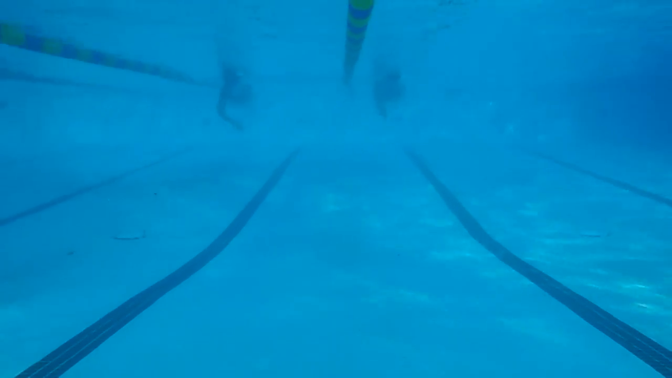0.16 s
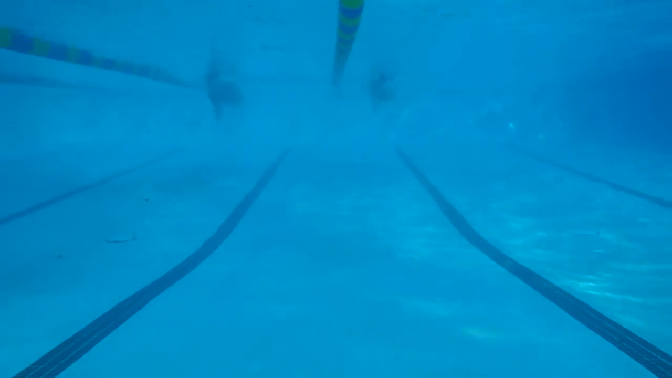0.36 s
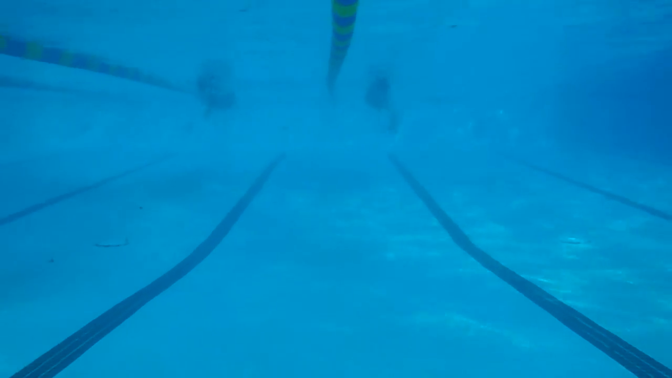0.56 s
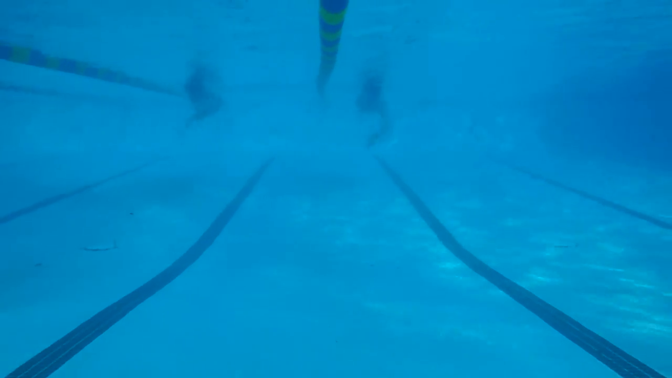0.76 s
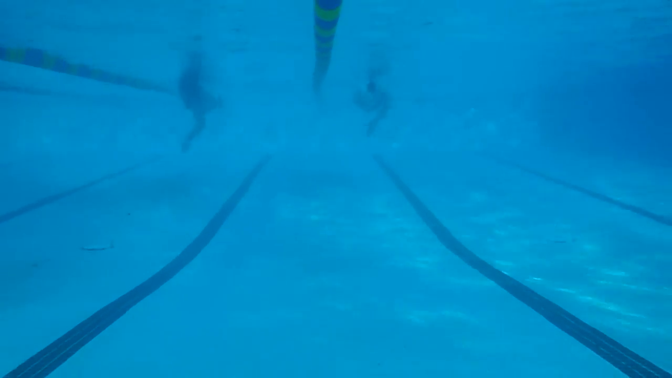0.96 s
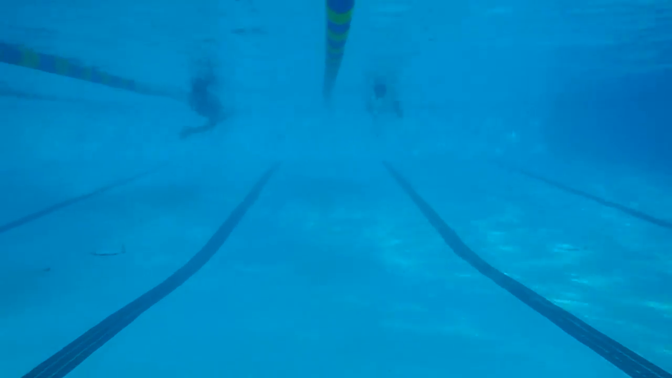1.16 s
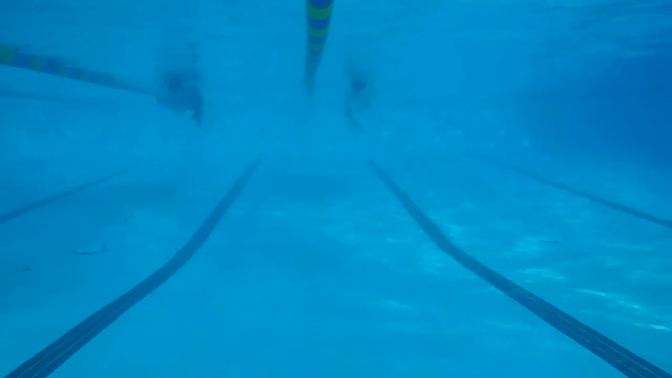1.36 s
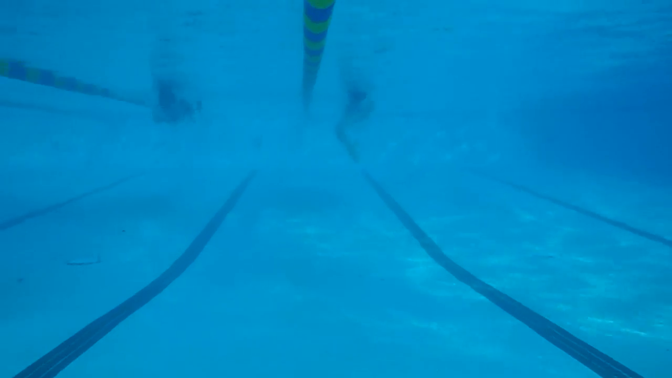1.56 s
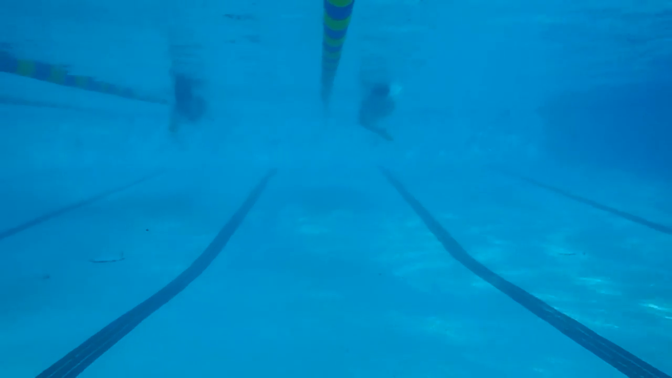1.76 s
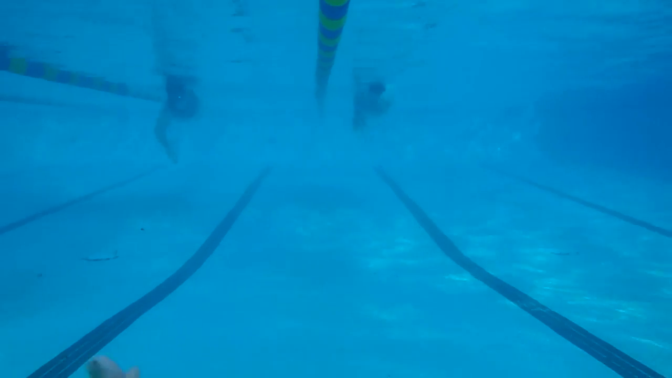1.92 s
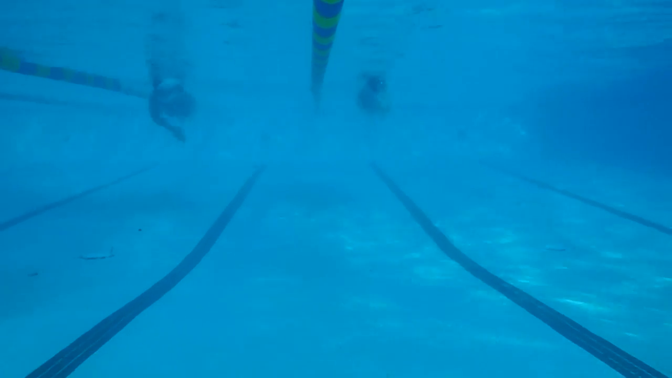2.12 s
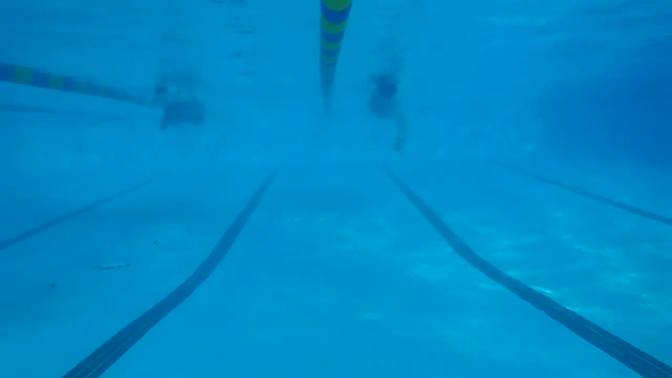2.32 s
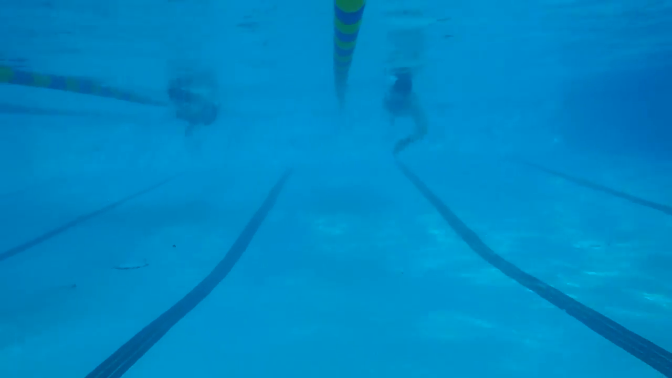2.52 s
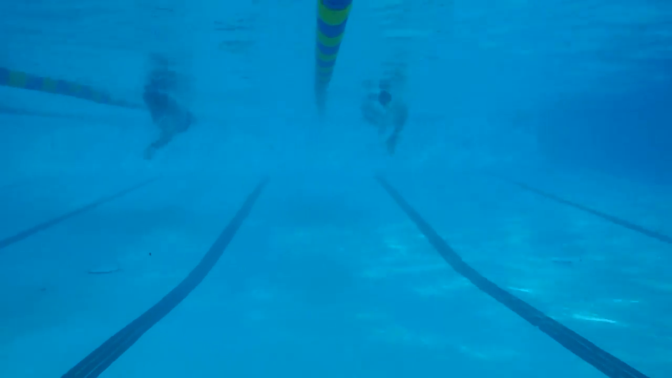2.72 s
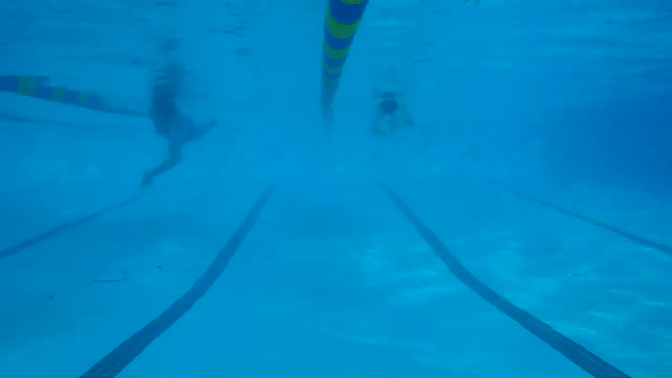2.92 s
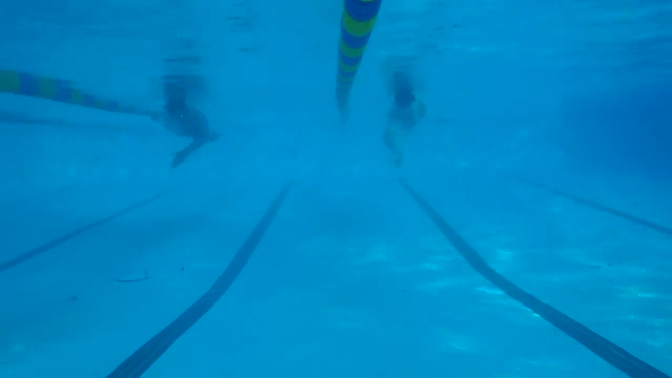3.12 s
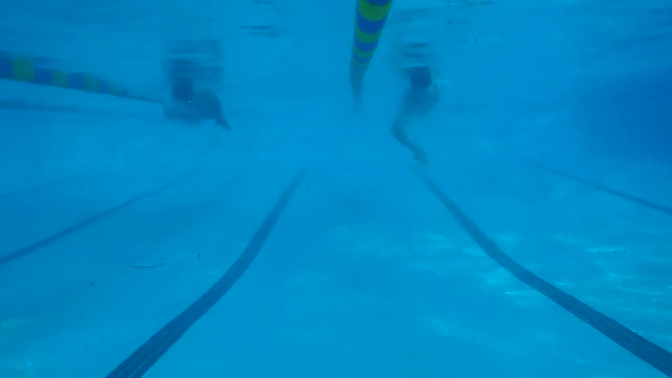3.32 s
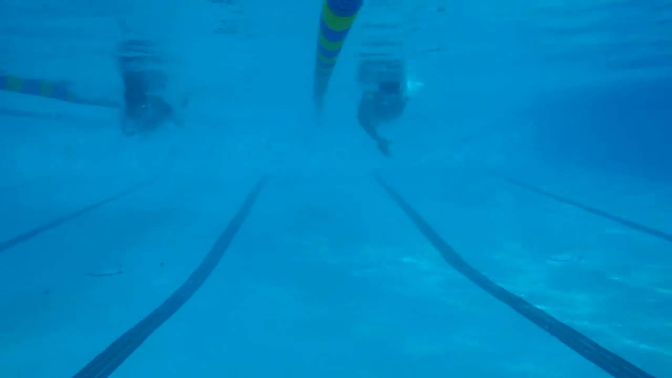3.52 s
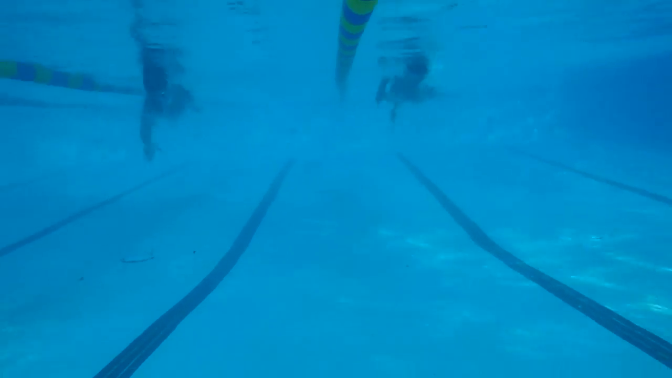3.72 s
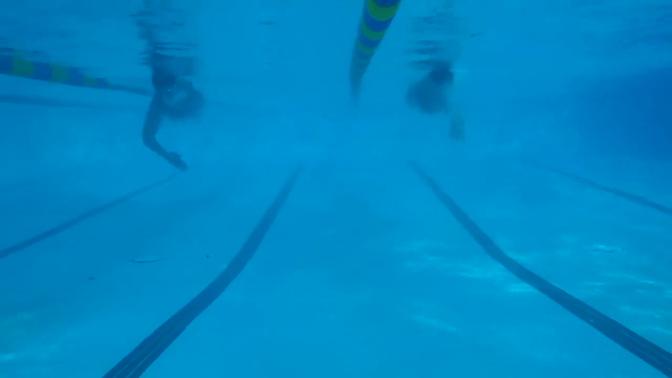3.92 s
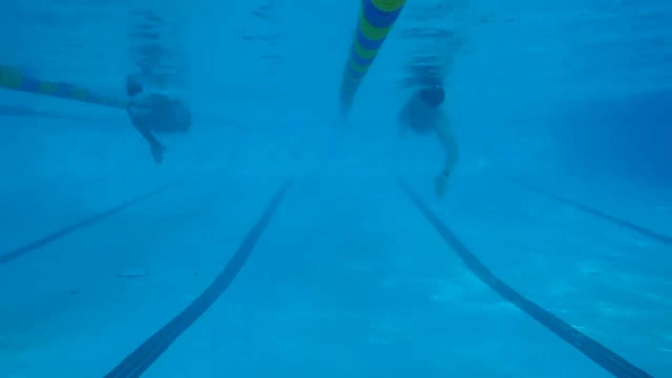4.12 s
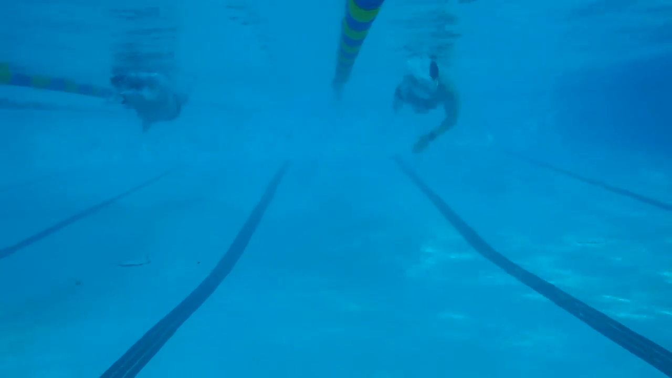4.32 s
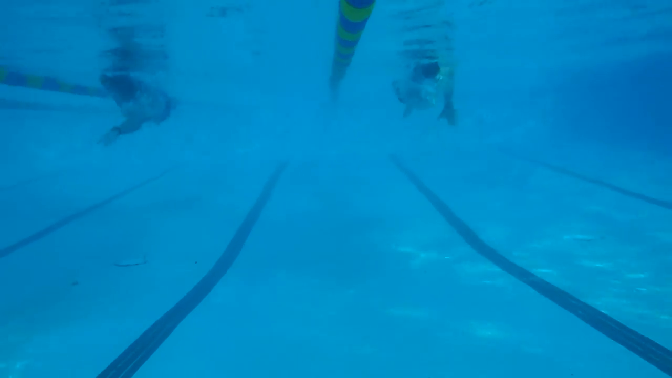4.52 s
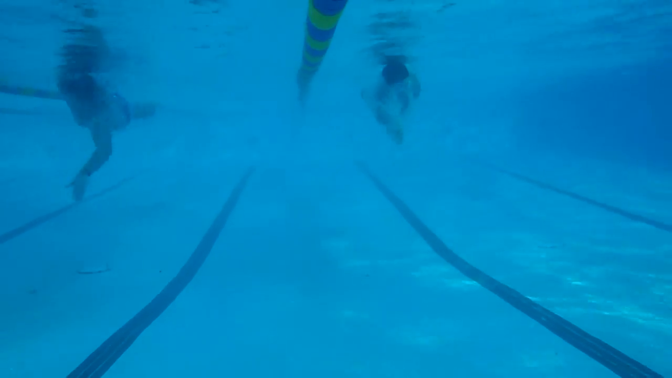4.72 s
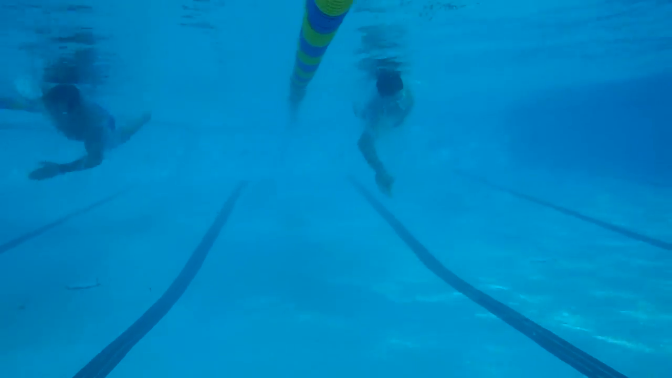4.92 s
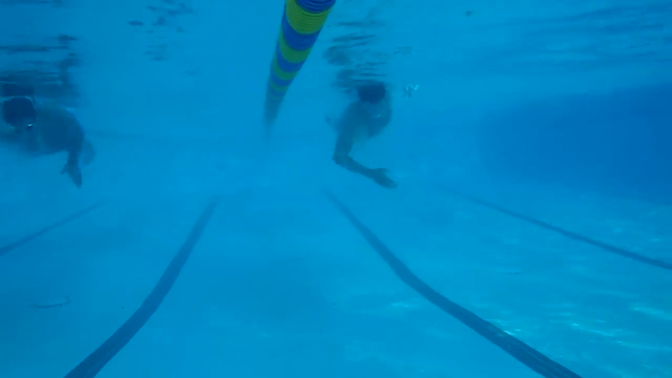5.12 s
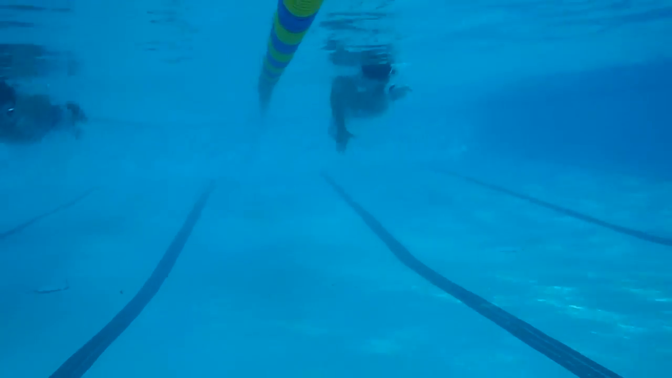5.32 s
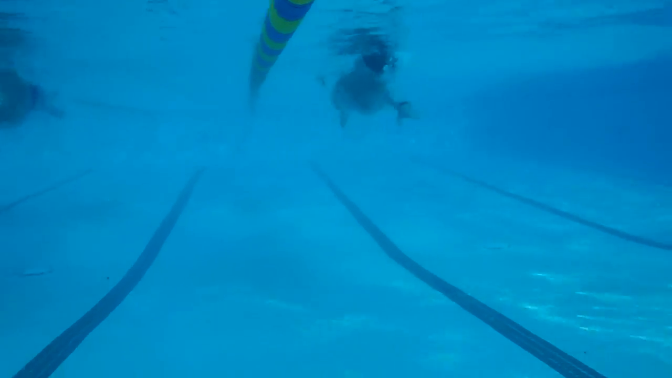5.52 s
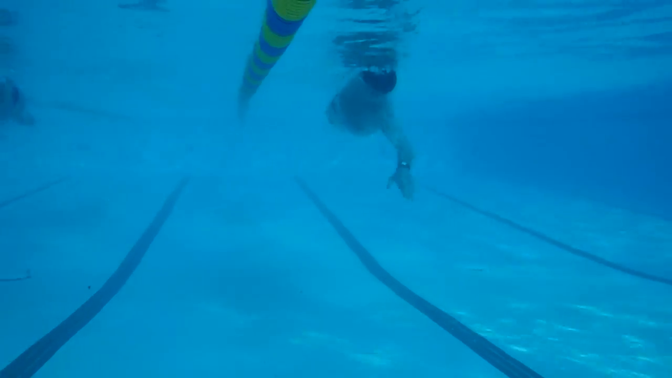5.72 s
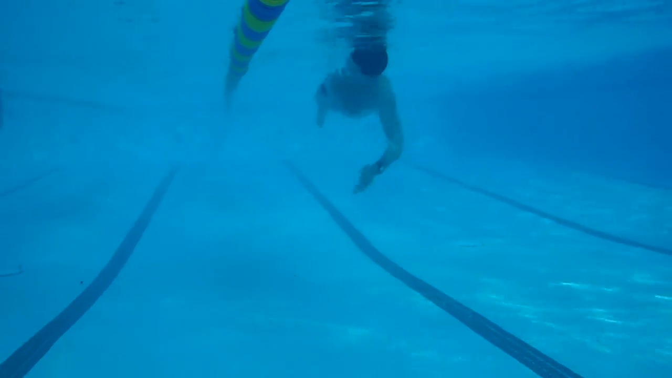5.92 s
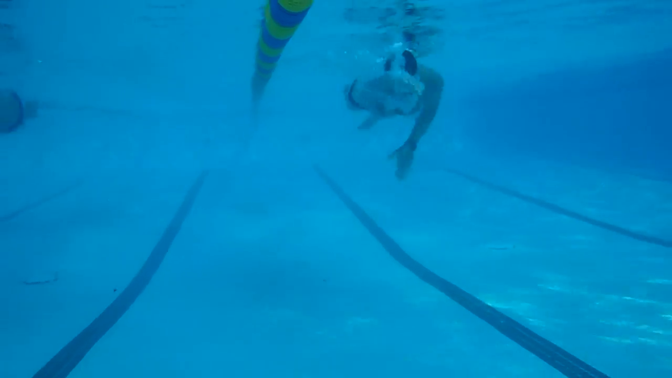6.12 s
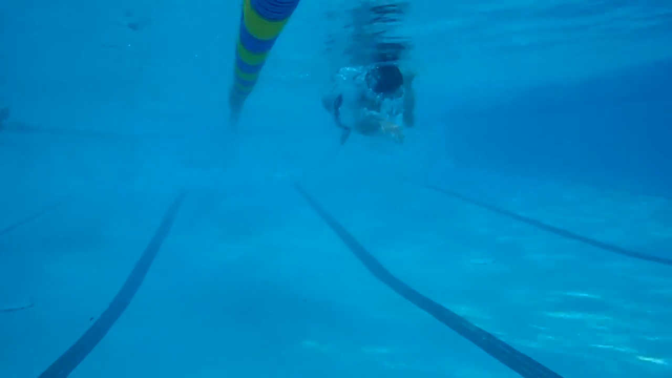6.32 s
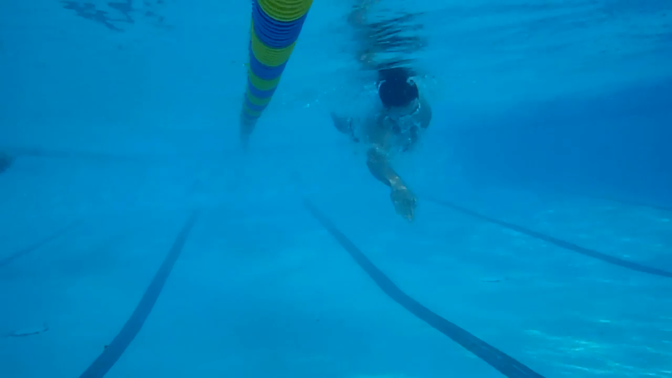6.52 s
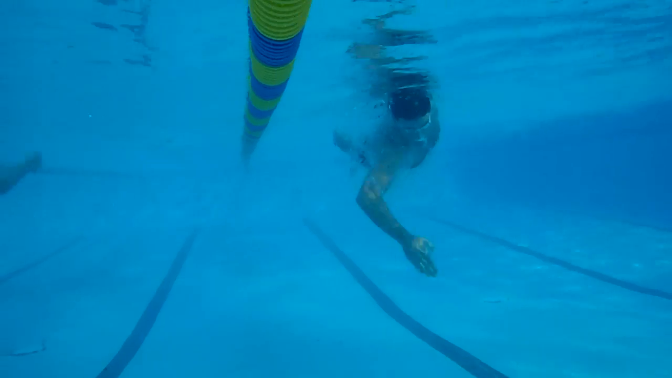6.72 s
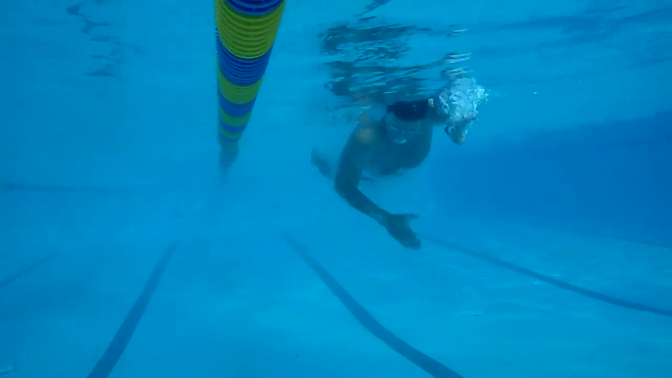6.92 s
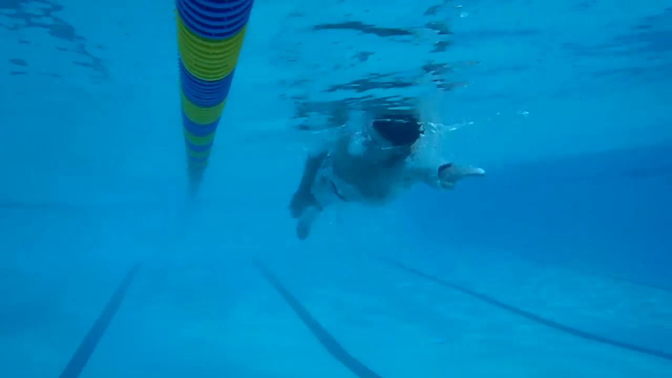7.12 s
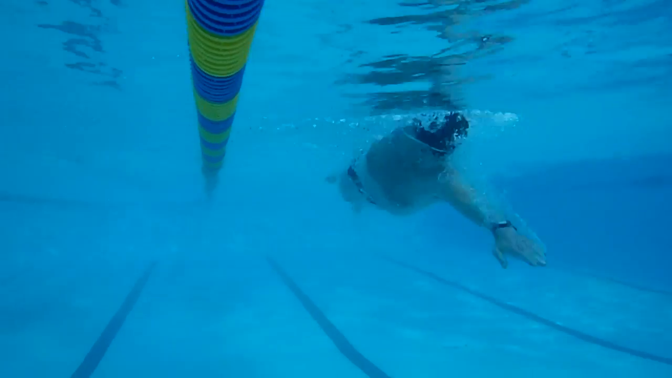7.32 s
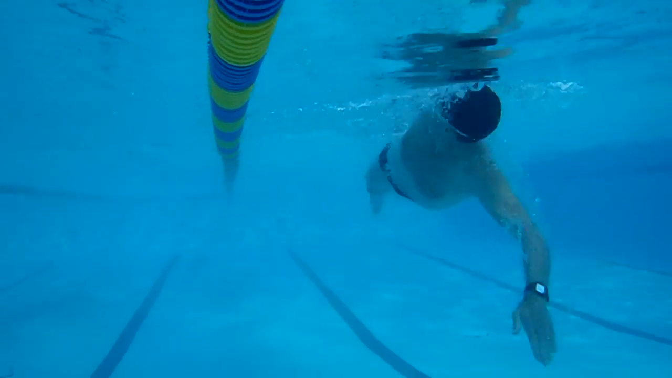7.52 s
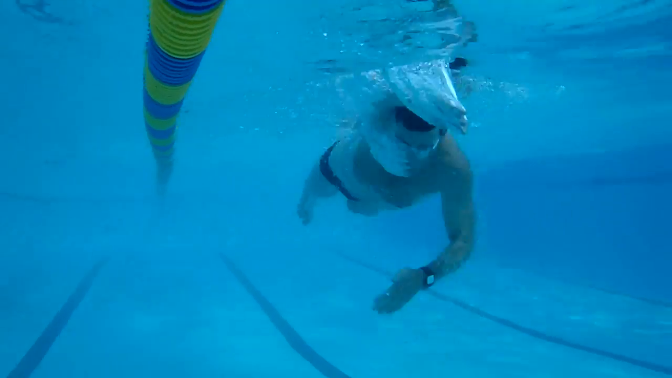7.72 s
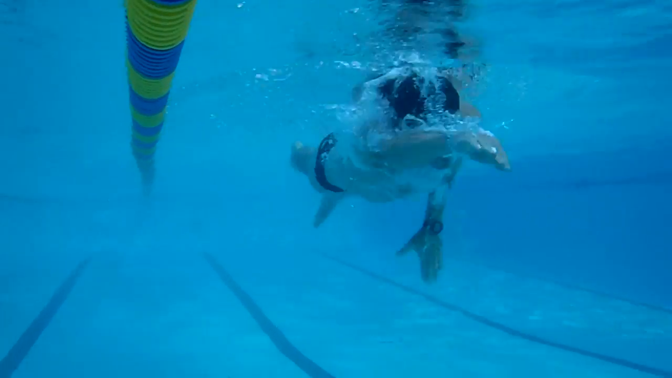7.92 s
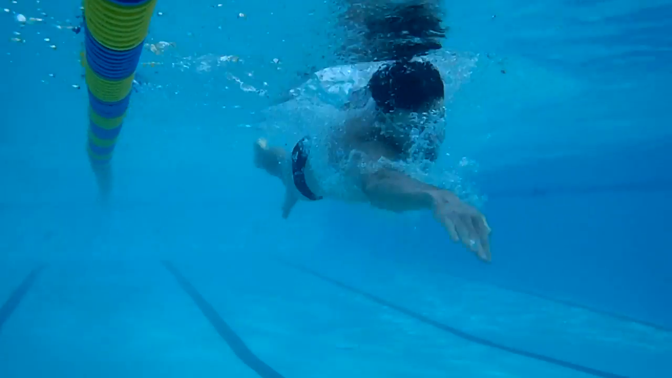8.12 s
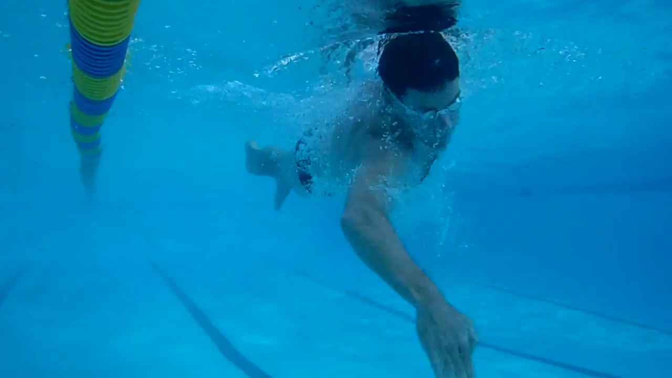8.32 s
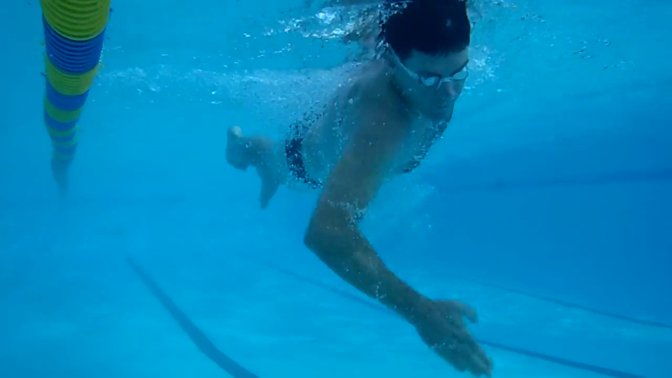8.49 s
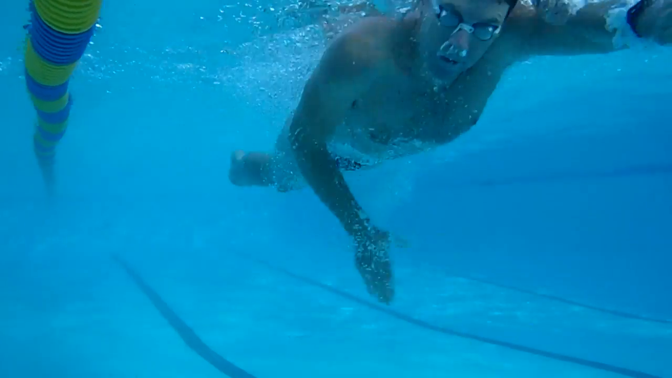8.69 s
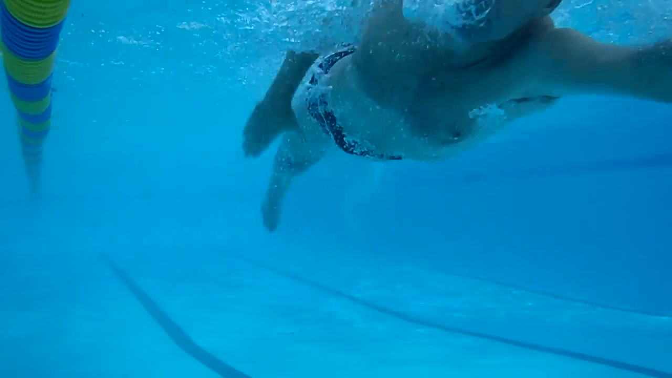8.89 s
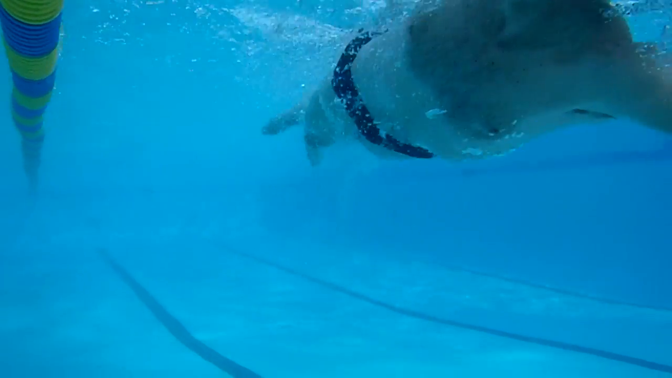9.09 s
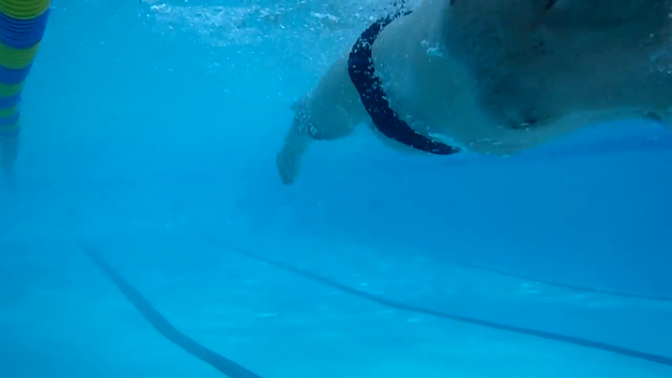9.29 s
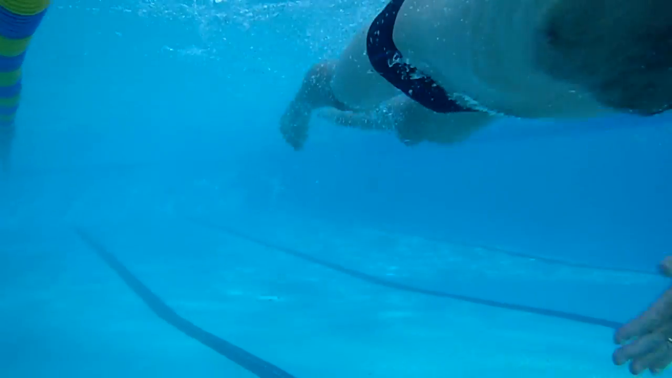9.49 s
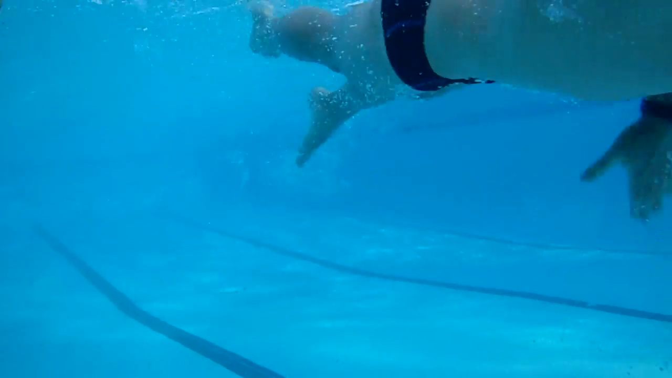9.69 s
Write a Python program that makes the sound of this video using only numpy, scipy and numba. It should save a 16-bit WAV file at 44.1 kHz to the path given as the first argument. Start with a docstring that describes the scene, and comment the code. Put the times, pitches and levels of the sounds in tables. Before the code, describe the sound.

Dull, bubbling water is heard from beneath the surface of a swimming pool, through a sealed camera housing. The strokes and kicks of approaching swimmers add gentle surges, short bubble pops and scattered low thumps. After the middle come a few heavy thumps and a deep, brief boom. Then one swimmer goes by close to the microphone, with louder churning, gurgling, ringing bubbles and a cluster of thumps.

```python
"""Swimmers heard from under water

A sealed camera lies in a pool while two swimmers crawl towards it and one passes overhead.
Strokes and kicks trap air: swarms of small bubbles ring through the housing, large pockets
thump for a few cycles and very large ones boom. Moving water rumbles below them,
and the microphone hisses faintly."""
import sys
import numpy as np
from scipy import signal
from scipy.fft import rfft, irfft
from scipy.io import wavfile
from numba import njit

SR = 44100
rng = np.random.default_rng(int(sys.argv[2]) if len(sys.argv) > 2 else 0)


def wav_out(sig):
    """Save sig, one row per channel (or a flat mono array), as 16-bit PCM at SR to the path in sys.argv[1]."""
    wavfile.write(sys.argv[1], SR, np.round(np.clip(np.atleast_2d(sig).T, -1, 1) * 32767).astype(np.int16))


N = 429975


def undb(db):
    """Turn decibels into a plain multiplier."""
    return 10 ** (np.asarray(db) / 20)


def unit(x):
    """Scale a sound to an average power of 1."""
    return x / np.sqrt(np.mean(x ** 2))


def colour(x, points):
    """Filter a sound so that its tone follows a curve of (pitch_hz, gain_db) points."""
    size = 8192
    hz, db = np.transpose(points)
    grid_hz = np.maximum(np.arange(size // 2 + 1), 1) * SR / size
    gain = undb(np.interp(np.log(grid_hz), np.log(hz), db))
    cepstrum = irfft(np.log(gain), size)
    # folding this onto its first half makes the filter ring only after a sound, never before
    cepstrum[1:size // 2] *= 2
    cepstrum[size // 2 + 1:] = 0
    response = irfft(np.exp(rfft(cepstrum)), size)
    return signal.fftconvolve(x, response)[:len(x)]


@njit
def ring(n, start_s, pitch_hz, ring_s, peak, glide, rise_cycles, hold, overtone):
    """Air in water pulses like a spring: each note swells, glides and fades 60 dB over ring_s."""
    out = np.zeros(n)
    for k in range(len(start_s)):
        t = np.arange(int(ring_s[k] * SR) + 2) / SR
        rise = (1 - np.exp(-t * pitch_hz[k] / rise_cycles)) ** 2
        fade = np.exp(-np.log(1000) * (t / ring_s[k]) ** hold)  # hold 1: plain fade; 2: held, then cut
        swell = rise * fade
        swell *= peak[k] / swell.max()
        first, cycles = int(start_s[k] * SR), 0.
        for i in range(min(len(t), n - first)):
            cycles += pitch_hz[k] * 2 ** (glide[k] * cycles) / SR  # glide is in octaves per cycle
            octave = overtone * np.cos(4 * np.pi * cycles + 1)  # a wide, lopsided swing adds this
            out[first + i] += swell[i] * (np.cos(2 * np.pi * cycles) + octave)
    return out


def ring_rows(table, pitch_ratio, rise_cycles, hold, overtone=0.):
    """Ring one note per row; each cycle multiplies its pitch by pitch_ratio."""
    start_s, level_db, pitch_hz, ring_s = np.transpose(table)
    glide = np.full(len(start_s), np.log2(pitch_ratio))
    return ring(N, start_s, pitch_hz, ring_s, undb(level_db), glide, rise_cycles, hold, overtone)


def swarm(count, low_hz, high_hz, ring_cycles, spread_db, rise_cycles, tilt):
    """Random bubbles, a few much louder than the rest; more tilt favours the high ones."""
    when, height, glide, luck = rng.random((count, 4)).T
    pitch_hz = low_hz * (high_hz / low_hz) ** height
    extra_db = np.minimum(-spread_db * np.log(1 - luck), 11)
    peak = pitch_hz ** tilt * undb(extra_db)
    start_s, ring_s = when * N / SR, ring_cycles / pitch_hz
    return unit(ring(N, start_s, pitch_hz, ring_s, peak, .02 * glide, rise_cycles, hold=.83, overtone=0.))


def clicks(start_s, level_db):
    """Silence with a one-sample spike at each start time."""
    spikes = np.zeros(N)
    spikes[(start_s * SR).astype(int)] = undb(level_db)
    return spikes


def microphone_hiss(fizz_db):
    """A faint, high hiss that partly follows the level of the fizz."""
    # tone of the hiss: pitch_hz, gain_db
    hiss_tone = [(3000, -44), (4700, -5), (5500, -1), (7000, -9.5), (9500, -13), (11000, -18), (13500, -18),
                 (14500, -31.5)]
    level_db = -73.5 + 0.61 * (fizz_db - np.median(fizz_db))
    return undb(level_db) * unit(colour(rng.standard_normal(N), hiss_tone))


def rumble(gurgle_db, deep_db):
    """Small gulps of trapped air, and below them the flow of water past the housing."""
    # tone of the gurgling air: pitch_hz, gain_db
    gurgle_tone = [(40, -27.5), (85, 1), (130, 5), (180, -0.5), (235, -1.5), (280, -8), (330, -15),
                   (600, -66), (3000, -120)]
    # tone of the deep flow: pitch_hz, gain_db
    deep_tone = [(8, -18), (22, -1.5), (40, 6.5), (60, 6.5), (85, 2), (140, -39), (2000, -120)]
    gulps = swarm(900, low_hz=69.6, high_hz=274.6, ring_cycles=17.6, spread_db=1.5,
                  rise_cycles=0.52, tilt=.9)
    noise = undb(16.5) * rng.standard_normal(N)  # most of its power is filtered away
    gurgle = unit(colour(gulps + noise, gurgle_tone))
    deep = unit(colour(rng.standard_normal(N), deep_tone))
    return undb(gurgle_db) * gurgle + undb(deep_db) * deep


def churn(wash_db, fizz_db, bright_db):
    """Near bubbles stand out of the wash of far ones; the housing colours both."""
    # how the housing passes sound: pitch_hz, gain_db
    housing_tone = [(150, -38), (260, -16.5), (325, -23.5), (390, -16.5), (500, -11.5), (765, 1.5),
                    (990, -6), (1240, 0), (1460, -7.5), (2000, -14.5), (2500, -26), (4000, -70.5),
                    (14000, -120)]
    # tone of the fine fizz: pitch_hz, gain_db
    fizz_tone = [(1000, -59), (1900, -15.5), (2300, -4.5), (2680, -6.5), (2910, -2), (3350, -7.5),
                 (3600, -16), (4300, -12.5), (4700, -25), (5500, -29), (7000, -42), (14000, -62)]
    near = swarm(14000, low_hz=301.3, high_hz=5076.0, ring_cycles=41.7, spread_db=2.0,
                 rise_cycles=0.99, tilt=0.47)
    far = undb(6) * rng.standard_normal(N)
    wash = unit(colour(near + far, housing_tone))
    fizz = unit(colour(near + far, fizz_tone))
    low = signal.sosfiltfilt(signal.butter(2, 1000, fs=SR, output="sos"), wash)
    high = wash - low
    wash = undb(-bright_db / 2) * low + undb(bright_db / 2) * high
    return undb(wash_db) * wash + undb(fizz_db) * fizz


def splash_lift(wash_db):
    """How many dB the splashes add to the wash: each cloud of bubbles swells and fades."""
    # bubble clouds from hands and feet: peak_s, level_db, fade_s
    splashes = [(.32, -32, 0.046), (.66, -32.5, 0.053), (1.08, -32, 0.068), (1.3, -34, .05),
                (1.44, -33, 0.073), (2.2, -32, 0.17), (2.609, -26.5, 0.032), (2.72, -24, .03),
                (2.79, -26, .06), (3.641, -29, 0.12), (4.26, -28.5, 0.026), (4.43, -31, 0.18),
                (4.67, -31, .1), (5.11, -35, 0.024), (5.21, -31.5, 0.071), (5.4, -32, .05),
                (5.57, -32, 0.23), (6.05, -31, .03), (6.13, -31.5, 0.16), (6.41, -30.5, .08),
                (6.81, -44, 0.03), (6.981, -26.5, 0.056), (7.09, -30, 0.045), (7.44, -29, 0.17),
                (7.68, -41, 0.014), (7.75, -25.5, 0.016), (7.929, -26, 0.057), (8.01, -37, .05),
                (8.17, -27.5, 0.055), (8.28, -31.5, .03), (8.36, -28, 0.075), (8.72, -35, .06),
                (8.85, -23.5, 0.027), (8.95, -27, 0.089), (9.179, -27, 0.032), (9.26, -27, 0.016),
                (9.32, -34.5, 0.059), (9.489, -26.5, 0.065)]
    rise_share, step = 0.61, 32  # rise time as a share of the fade; samples per level step
    t = np.arange(0, N, step) / SR
    power = 0
    for peak_s, level_db, fade_s in splashes:
        from_peak = np.where(t < peak_s, (peak_s - t) / rise_share, t - peak_s)
        power += undb(2 * level_db) * np.exp(-2 * from_peak / fade_s)
    return 10 * np.log10(1 + np.repeat(power, step)[:N] / undb(2 * wash_db))


def ticks():
    """Faint, bright crackles, each two or three milliseconds long."""
    # the crackles: start_s, strength_db
    crackles = [(0.9014, -57), (4.9816, -50), (5.221, -46), (5.3877, -63), (6.0387, -51), (6.4303, -48),
                (7.7494, -54), (8.4085, -47), (9.4534, -44), (9.4759, -48)]
    # tone of a crackle: pitch_hz, gain_db
    tick_tone = [(1500, -12.5), (4500, 8), (7000, -5.5), (10000, -17), (14000, -19.5)]
    start_s, strength_db = np.transpose(crackles)
    fade = np.exp(-np.arange(500) / (0.0016 * SR))
    bursts = signal.fftconvolve(clicks(start_s, strength_db), fade)[:N]
    return undb(4.5) * colour(bursts * rng.standard_normal(N), tick_tone)


def clear_notes():
    """Short, slightly rising notes: single bubbles, plus the loudest thump's brief overtone at 6.41 s."""
    # clear notes: start_s, level_db, pitch_hz, ring_s
    notes = [(1.4706, -31, 1940, 0.034), (4.6413, -32.5, 2240, 0.03), (4.7316, -38.5, 2760, 0.033),
             (6.412, -15.5, 428, 0.024), (8.689, -27.5, 402, 0.14), (8.798, -27, 435, 0.067),
             (9.109, -25.5, 530, 0.11), (9.129, -25, 416, 0.099), (9.24, -24, 530, 0.14),
             (9.369, -26, 399, 0.27), (9.476, -10, 495, 0.023), (9.677, -20, 552, 0.072)]
    return ring_rows(notes, pitch_ratio=1.003, rise_cycles=1.6, hold=1.02)


def pops():
    """A loud bubble pinches off with a short knock through the housing, then rings."""
    # loud bubbles: start_s, level_db, pitch_hz, ring_s, knock_db (higher means a harder knock)
    loud_bubbles = [(0.052, -28, 890, 0.089, -54), (0.903, -21.5, 630, 0.033, -26.5),
                    (1.087, -17.5, 866, 0.025, -46), (1.294, -24.5, 1157, 0.061, -52),
                    (1.851, -21, 750, 0.026, -47), (2.189, -23, 1207, 0.074, -43),
                    (2.6, -22, 886, 0.037, -42), (3.409, -23.5, 760, 0.069, -46),
                    (3.477, -23, 815, 0.026, -40), (3.553, -28.5, 833, 0.086, -50),
                    (4.094, -19, 766, 0.044, -54), (4.322, -22, 1120, 0.03, -37),
                    (4.552, -23, 765, 0.03, -40), (4.68, -13, 950, 0.016, -52),
                    (4.981, -14, 1254, 0.017, -39), (5.222, -11, 1210, 0.028, -47),
                    (5.223, -17, 800, 0.03, -41), (5.388, -16, 1380, 0.041, -29),
                    (5.428, -27, 700, 0.03, -39), (5.596, -21, 768, 0.06, -41),
                    (6.04, -9.5, 1246, 0.026, -41), (6.216, -22, 1290, 0.03, -45),
                    (6.271, -22, 1130, 0.024, -31), (6.43, -26, 830, 0.018, -27.5),
                    (6.589, -22.5, 1580, 0.045, -36), (6.818, -25.5, 572, 0.069, -29),
                    (6.984, -14, 1077, 0.04, -52), (7.51, -17.5, 1207, 0.052, -52),
                    (7.682, -18.5, 1160, 0.045, -59), (7.892, -14.5, 1170, 0.019, -50),
                    (7.921, -13.5, 1310, 0.024, -49), (8.002, -20, 772, 0.034, -55),
                    (8.058, -22, 1120, 0.033, -37), (8.252, -22, 815, 0.054, -52),
                    (8.492, -25, 765, 0.026, -44), (8.538, -18, 684, 0.059, -47),
                    (8.798, -25.5, 806, 0.03, -29), (8.822, -17.5, 836, 0.068, -37),
                    (8.927, -15, 720, 0.029, -41), (9.22, -19.5, 740, 0.023, -35),
                    (9.314, -16.5, 753, 0.088, -47), (9.37, -16, 690, 0.031, -48),
                    (9.453, -21, 1310, 0.027, -23.5), (9.473, -15, 1120, 0.02, -31.5),
                    (9.652, -21, 656, 0.035, -43)]
    # tone of a knock through the housing: pitch_hz, gain_db
    knock_tone = [(300, -21.5), (800, -4.5), (1300, -5), (2200, -10.5), (3200, -17), (4400, -29.5),
                  (5000, -41), (9000, -54), (14000, -66)]
    start_s, level_db, pitch_hz, ring_s, knock_db = np.transpose(loud_bubbles)
    glide = np.full(len(start_s), 0.0057)
    notes = ring(N, start_s, pitch_hz, ring_s, undb(level_db), glide,
                 rise_cycles=0.36, hold=1.17, overtone=0.)
    spikes = clicks(start_s, level_db + knock_db)
    t = np.arange(1300) / SR
    knock_shape = np.exp(-t / 0.0063) * (1 - np.exp(-t / 0.00019))
    bursts = signal.fftconvolve(spikes, knock_shape)[:N] * rng.standard_normal(N)
    return notes + undb(39.0) * colour(bursts + undb(11.5) * spikes, knock_tone)


def shoves():
    """A limb shoves water past the housing: one deep swing of pressure, sagging in pitch."""
    # pushes of water: start_s, level_db
    pushes = [(.004, -24), (.028, -31), (3.117, -26), (3.253, -31), (3.513, -22.5), (4.396, -26),
              (4.421, -18), (4.981, -14.5), (5.971, -12), (6.412, -18), (6.648, -32), (8.169, -27),
              (8.718, -22), (9.449, -25), (9.475, -10), (9.503, -18.5), (9.554, -21)]
    pitch_hz, ring_s = 58.4, 0.087
    rows = [(start_s, level_db, pitch_hz, ring_s) for start_s, level_db in pushes]
    return ring_rows(rows, pitch_ratio=0.85, rise_cycles=0.36, hold=1.8)


def booms():
    """Very large pockets of air pulse slowly, giving a long, deep note."""
    # very large air pockets: start_s, level_db, pitch_hz, ring_s
    huge_pockets = [(1.227, -29, 43.8, 0.41), (3.849, -34.5, 56.3, 0.45), (6.679, -15, 51.6, 0.34),
                    (8.584, -12.5, 50.5, 0.39)]
    return ring_rows(huge_pockets, pitch_ratio=1.005, rise_cycles=.33, hold=1.7, overtone=0.07)


def thumps():
    """A large pocket of air pulses for a few cycles and a smaller one splits off it."""
    # large air pockets: start_s, level_db, pitch_hz, ring_s
    large_pockets = [(0.004, -14, 159, 0.02), (0.028, -11, 129, 0.026), (0.079, -33, 80, 0.05),
                     (0.273, -11, 150, 0.036), (0.365, -20, 219, 0.033), (0.917, -21.5, 91, 0.044),
                     (1.039, -24, 125, 0.053), (1.112, -31, 141, 0.05), (1.312, -20, 107.6, 0.043),
                     (1.35, -25.5, 134, 0.1), (1.868, -23.5, 144, 0.03), (3.117, -23, 95, 0.041),
                     (3.198, -22.5, 177, 0.036), (3.253, -21.5, 101, 0.031), (3.513, -6.5, 104, 0.029),
                     (4.257, -22, 265, 0.039), (4.26, -13.5, 135.7, 0.035), (4.397, -13.5, 150, 0.03),
                     (4.42, -13.5, 74, 0.064), (4.981, -8.5, 137.5, 0.048), (5.806, -26.5, 155, 0.06),
                     (5.971, -4.5, 125.5, 0.048), (5.886, -25.5, 145, 0.081), (6.102, -19.5, 154, 0.045),
                     (6.412, -1.5, 139.7, 0.038), (6.193, -21.5, 178, 0.025), (6.65, -22, 216, 0.05),
                     (6.934, -31, 158, 0.091), (7.121, -25.5, 236, 0.07), (7.356, -17.5, 143, 0.028),
                     (7.596, -22, 144, 0.031), (7.739, -20, 153, 0.045), (7.85, -19, 220, 0.072),
                     (7.957, -19.5, 201, 0.04), (8.058, -11.5, 164, 0.023), (8.169, -22, 153, 0.037),
                     (8.718, -14.5, 182, 0.037), (8.743, -12, 160, 0.061), (8.815, -20.5, 246, 0.09),
                     (8.901, -11.5, 224, 0.039), (8.982, -15, 195, 0.085), (9.084, -23, 235, 0.07),
                     (9.275, -22, 255, 0.049), (9.36, -21, 187, 0.029), (9.448, -13.5, 103, 0.068),
                     (9.476, -5, 135, 0.024), (9.504, -12, 84.5, 0.1), (9.555, -2.5, 237, 0.063),
                     (9.589, -11, 234, 0.13), (9.672, -16, 199, 0.045), (9.722, -11.5, 199, 0.055)]
    pitch_ratio, rise_cycles = 0.99, 0.87
    main = ring_rows(large_pockets, pitch_ratio, rise_cycles, hold=2.3, overtone=0.088)
    start_s, level_db, pitch_hz, ring_s = np.transpose(large_pockets)
    split_db = level_db - 11.5 - 14 * np.maximum(np.log2(pitch_hz / 150), 0)  # small ones hardly split
    split_rows = np.transpose([start_s + 0.00609, split_db, 1.59 * pitch_hz, 2.0 * ring_s])
    return main + ring_rows(split_rows, pitch_ratio, rise_cycles, hold=1.3)


def scene():
    """Add the hiss, the moving water and the single sounds into one channel."""
    # the water's slowly changing levels: time_s, wash_db, fizz_db, gurgle_db, deep_db,
    # bright_db (how far the wash's treble is raised over its bass)
    water_levels = [(0.0, -34.5, -53, -34.5, -33.5, -2.5), (0.38, -32.5, -53, -44, -41, 2.5),
                    (0.72, -36, -55, -45, -37.5, -2), (1.22, -33, -52, -40, -41, 3),
                    (1.63, -34, -55, -43, -42.5, 1.5), (2.5, -33.5, -54.5, -41.5, -42, -1),
                    (3.07, -33, -54, -44, -44, 3), (3.42, -34, -54.5, -34.5, -38.5, -0.5),
                    (3.99, -33.5, -55, -45, -46, 1.5), (4.64, -33.5, -52.5, -40, -43.5, 2),
                    (4.95, -34.5, -54.5, -42, -45.5, -1), (5.48, -32.5, -52, -40, -41.5, 0.4),
                    (5.92, -36, -55.5, -39.5, -43, -2.5), (6.19, -30, -51, -35, -43, 4),
                    (6.65, -33.5, -54.5, -37, -42.5, 0.5), (7.03, -28.5, -50, -36.5, -45.5, 5.5),
                    (7.55, -33, -53.5, -34, -38, -1.2), (7.87, -28, -50.5, -28.5, -39, -1.5),
                    (8.47, -33, -53, -42, -46.5, -4.5), (8.69, -27.5, -46.5, -32.5, -43, -1.2),
                    (8.91, -26, -46, -30.5, -40, -3), (9.37, -27, -48.5, -29, -36.5, -3),
                    (9.54, -29, -49, -19, -39, -4), (9.75, -28.5, -48.5, -30, -38, 0)]
    time_s, *columns = np.transpose(water_levels)
    t = np.arange(N) / SR
    wash_db, fizz_db, gurgle_db, deep_db, bright_db = [np.interp(t, time_s, c) for c in columns]
    lift_db = splash_lift(wash_db)
    fizz_db += 0.51 * lift_db  # the fizz swells about half as many dB as the wash
    hiss = microphone_hiss(fizz_db)
    water = churn(wash_db + lift_db, fizz_db, bright_db) + rumble(gurgle_db, deep_db)
    single_sounds = thumps() + shoves() + booms() + clear_notes() + pops() + ticks()
    return (hiss + water + single_sounds)[None]


def record(dry):
    """The loudest thumps flatten against a rounded ceiling, and the highest treble is cut."""
    ceiling, hardness, top_hz = .63, 10, 14150
    flattened = dry / (1 + np.abs(dry / ceiling) ** hardness) ** (1 / hardness)
    treble_cut = signal.ellip(8, .2, 70, top_hz, fs=SR, output="sos")
    return signal.sosfilt(treble_cut, flattened)


dry = scene()
out = record(dry)
wav_out(out)
```